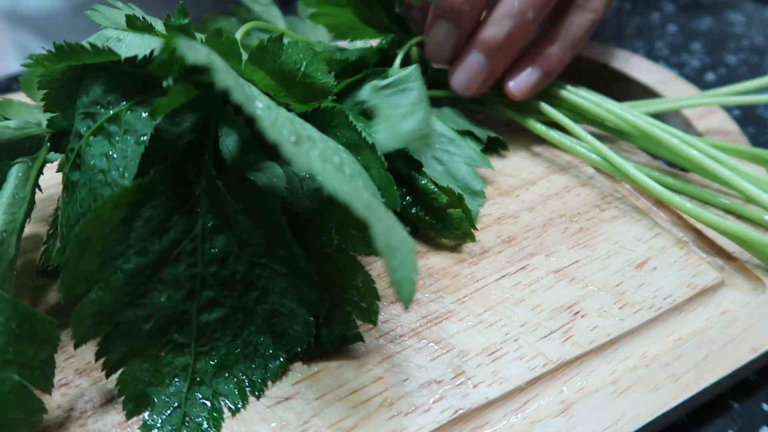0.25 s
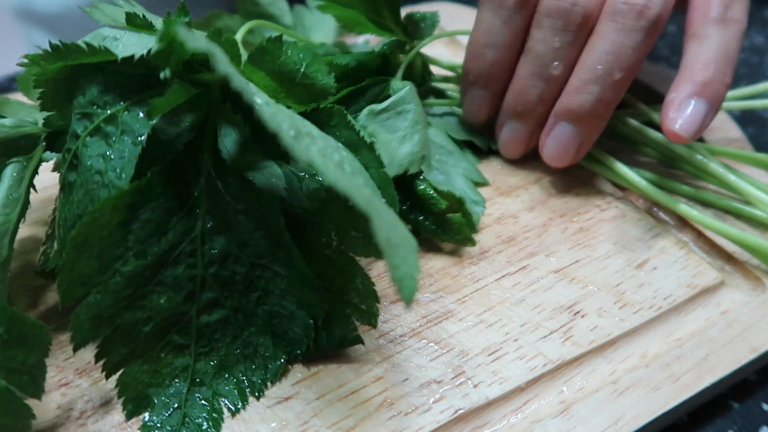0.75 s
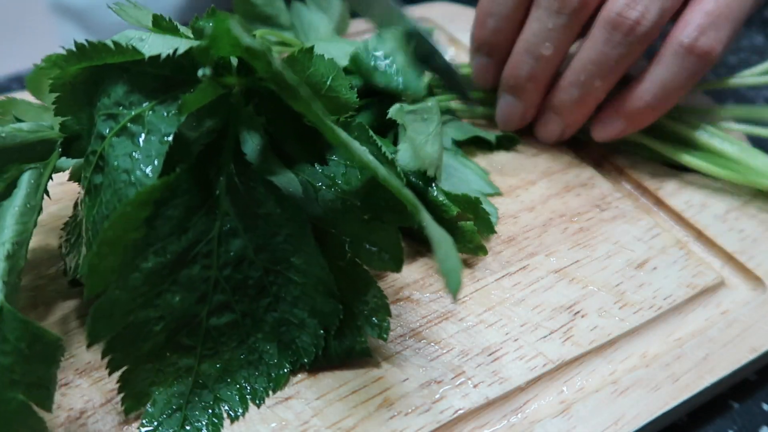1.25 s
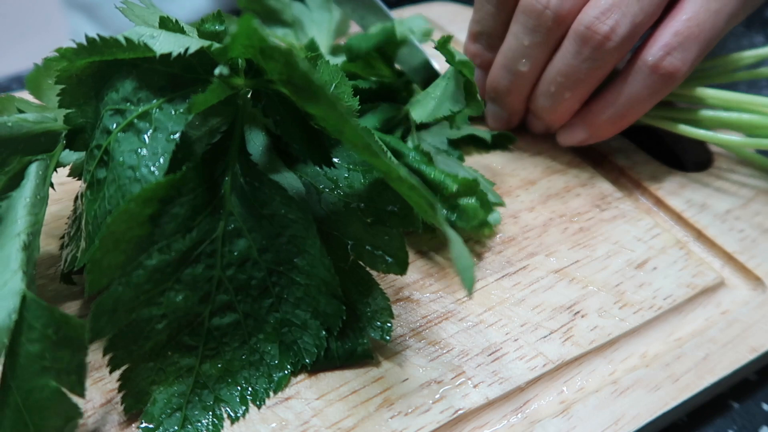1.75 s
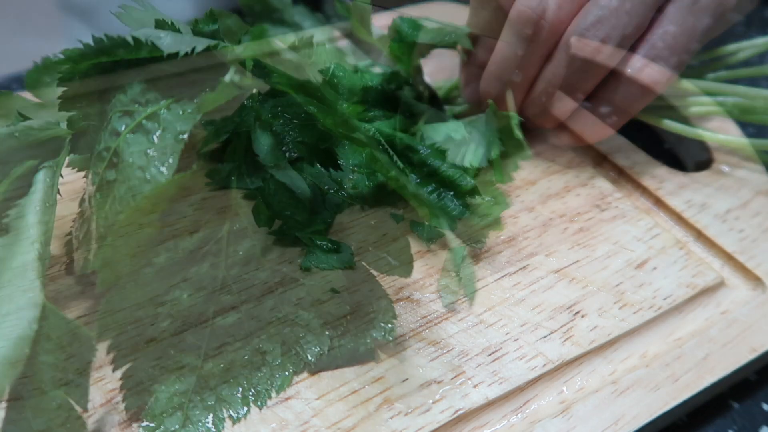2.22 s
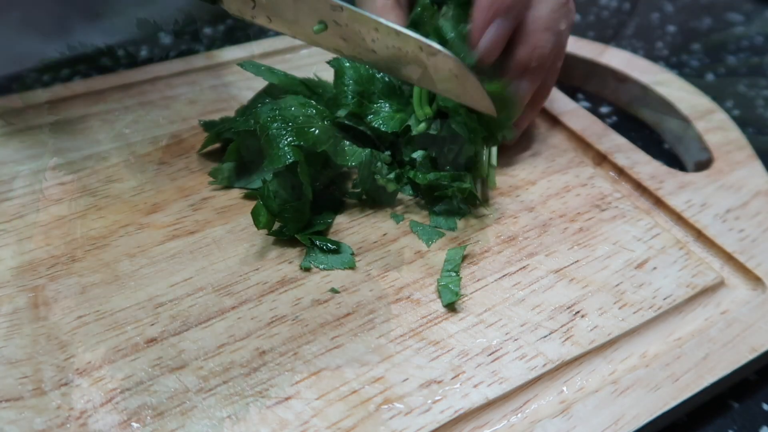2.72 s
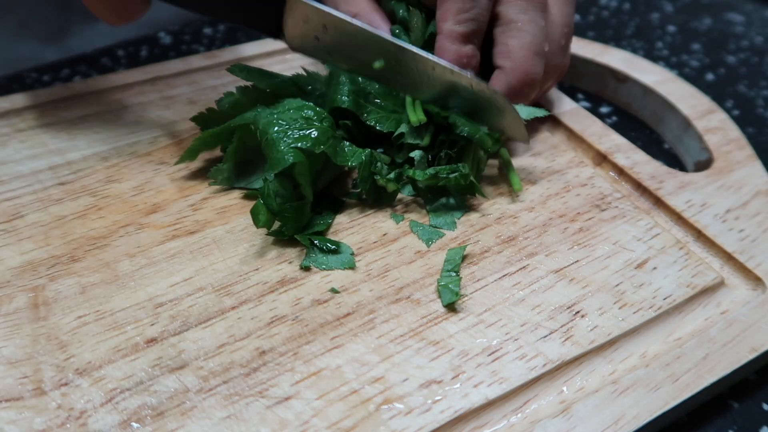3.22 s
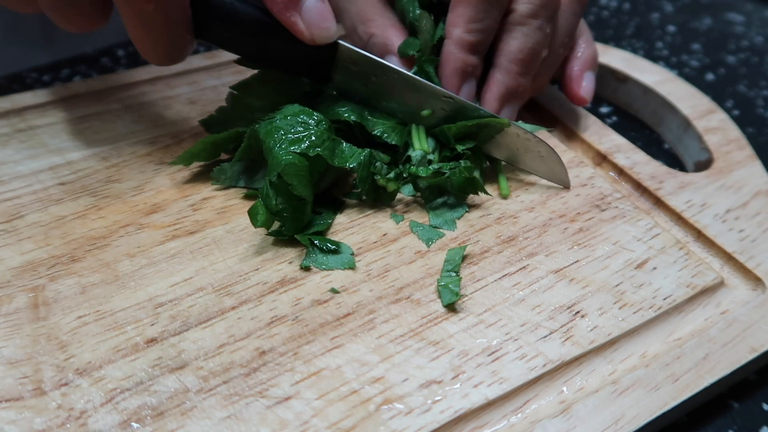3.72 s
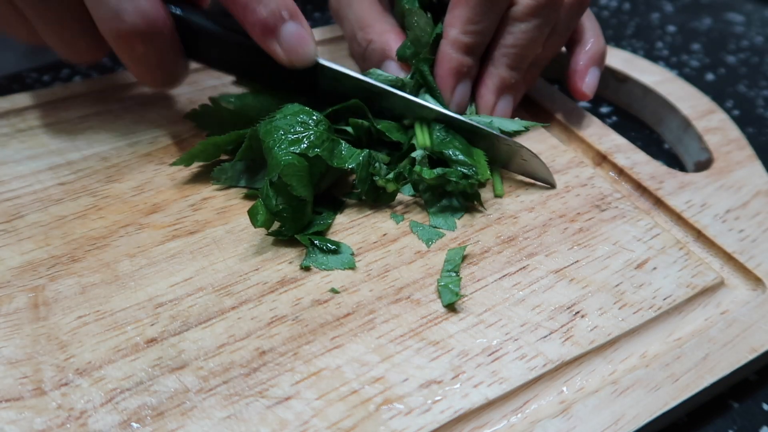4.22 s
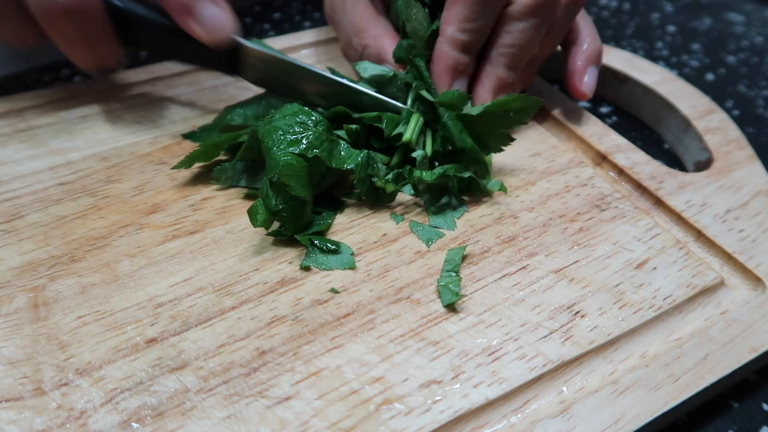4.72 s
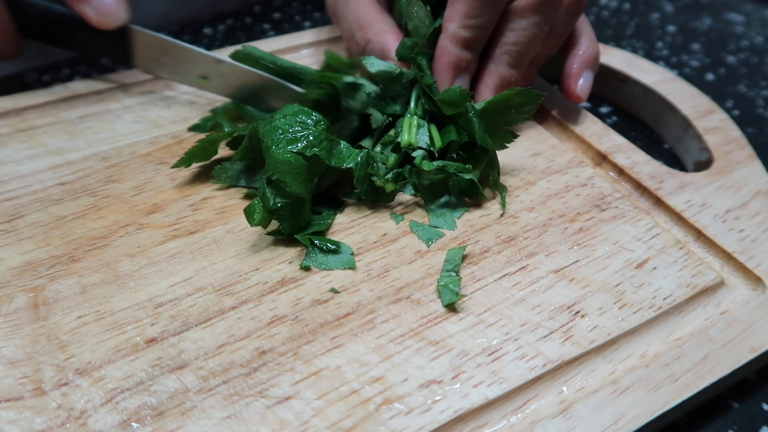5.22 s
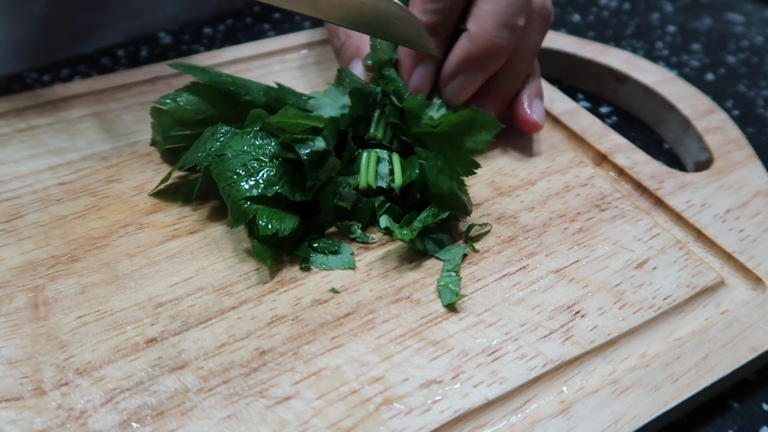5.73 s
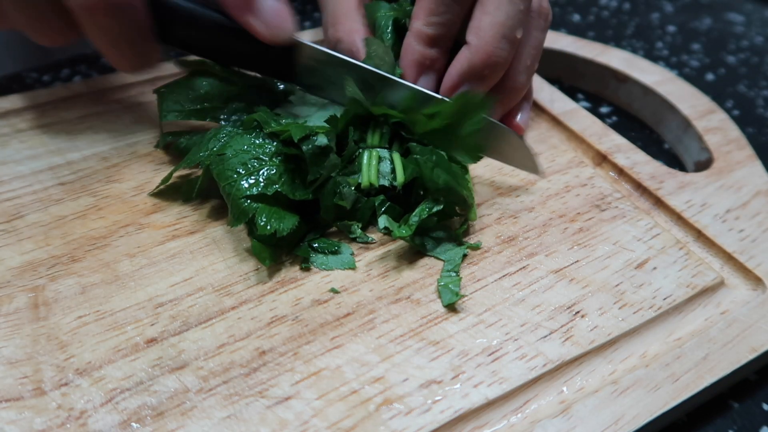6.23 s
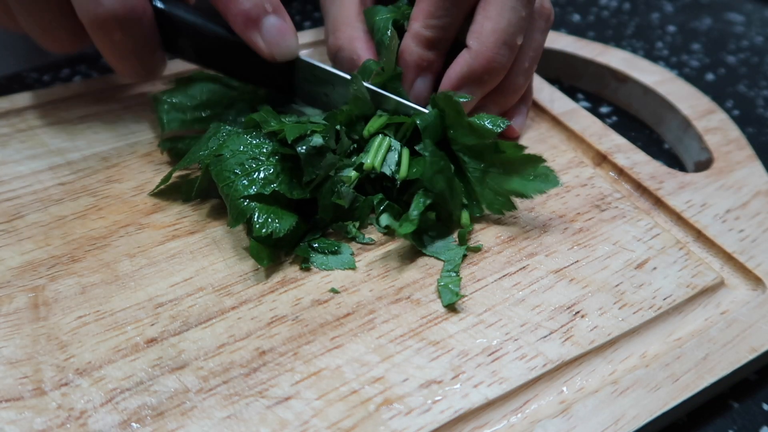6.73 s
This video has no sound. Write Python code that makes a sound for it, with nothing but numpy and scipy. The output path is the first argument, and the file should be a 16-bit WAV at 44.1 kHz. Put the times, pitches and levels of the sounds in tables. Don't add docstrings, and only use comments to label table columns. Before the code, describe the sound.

A small knife crunches through fresh leafy stems on a wooden board in two bursts, after soft leaf rustling, over a faint low kitchen hum.

```python
import sys
import numpy as np
from scipy import signal
from scipy.fft import rfft, irfft, next_fast_len
from scipy.io import wavfile
from scipy.ndimage import uniform_filter1d, map_coordinates

SR = 44100
rng = np.random.default_rng(int(sys.argv[2]) if len(sys.argv) > 2 else 0)


def boost(x):
    u = np.asarray(x, float) / 20
    return 10 ** u


def inscribe(sig):
    pcm = np.round(np.clip(np.atleast_2d(sig).T, -1, 1) * 32767)
    wavfile.write(sys.argv[1], SR, pcm.astype(np.int16))


N = 306936

# time_s, level_db
RUMBLE_LEVEL = [(0.0, -49), (0.15, -49.5), (0.52, -54.5), (0.89, -56.5), (1.27, -52), (1.55, -56.5),
                (1.76, -59.5), (2.09, -52.5), (2.46, -62), (3.0, -53), (3.89, -49.5), (4.59, -47),
                (4.92, -44), (5.23, -47), (6.07, -50), (6.49, -46), (6.75, -45), (6.96, -45.5)]
# frequency_hz, density_db
RUMBLE_SPECTRUM = [(18, -51), (30, -22.5), (48, -4.5), (70, -18), (86, -6), (113, 1), (129, -0.5),
                   (150, -4.5), (195, -2), (247, -5), (271, -15), (377, -15.5), (500, -23), (650, -54.5),
                   (1100, -120)]
# frequency_hz, density_db
AIR_SPECTRUM = [(180, -26), (300, -1.5), (493, -6.5), (563, -2.5), (747, -10), (882, -8.5), (1330, -12),
                (1600, -19.5), (2160, -22.5), (2820, -25), (4330, -35), (4790, -34), (12300, -49),
                (15800, -70.5)]
AIR_DB = -6
# multiple, level_db (against the rumble)
FRIDGE_ORDERS = [(1, -16.5), (2, -9.5), (3, -13), (4, -10)]
FRIDGE_HZ = 61.196
# frequency_hz, side_minus_mid_db
KITCHEN_SIDE = [(60, -27.5), (110, -31.5), (200, -15.5), (380, -3.5), (700, -6.5), (1290, -5), (2380, -0.5),
                (4400, 1.5), (8120, 1), (15000, 1.5)]
# frequency_hz, side_minus_mid_db
CUTTING_SIDE = [(60, -23), (110, -12), (200, -32.5), (380, -23), (700, -25.5), (1290, -44), (2380, -14.5),
                (4400, -6.5), (8120, 1.5), (15000, -1.5)]
# frequency_hz, t60_s
ROOM_DECAY = [(300, 0.183), (2000, 0.068), (10000, 0.076)]
# level_db, pitch_hz, rise_s, t60_s
STRAY_TONES = [
    (-42.5, 1080, .02, .2),
    (-54, 3500, .0005, .012),
    (-51, 3500, .0005, .012),
    (-43, 560, .003, .12),
    (-48, 1200, .001, .03),
    (-37, 45, .01, .12),
    (-38, 200, .005, .1),
    (-32, 2550, .0008, .018),
]
STRAY_STARTS = [.05, 1.208, 1.315, 3.091, 3.089, 4.705, 4.705, 2.8898]

# frequency_hz, density_db
CRUNCH_SPECTRUM = [(500, -39.5), (850, -4), (1040, -2), (1440, 3), (2090, 0), (2430, 3.5), (2700, 2),
                   (3250, 0.5), (7000, -18), (9100, -63.5), (15400, -120)]
# frequency_hz, density_db
CRISP_SPECTRUM = [(2650, -14.5), (4500, -2), (5300, -1), (10100, -6.5), (12500, -4), (14100, -10),
                  (15800, -9.5)]
# frequency_hz, density_db
PLANK_SPECTRUM = [(150, -43), (330, -11.5), (500, -3.5), (585, -6), (680, -4), (1000, -13.5), (1600, -42)]
# frequency_hz, width_hz, level_db
CRUNCH_MODES = [(1265, 258, -5.5), (2450, 145, -4.5)]
# frequency_hz, width_hz, level_db
BLADE_MODES = [(5400, 320, -4.5)]
# frequency_hz, width_hz, level_db
PLANK_MODES = [(585, 38.5, 2.5)]

# start_s, hold_s, crunch_db, crisp_db, board_pressure_db
CHOPS = [(4.047, 0.0083, -40.5, -13.5, 6), (4.249, 0.0478, -42, -11.5, 1), (4.49, 0.0198, -39.5, -12, 0.5),
         (4.706, 0.0162, -39.5, -11, 4), (4.812, 0.038, -47, -26, -7), (4.914, 0.0251, -36, -15, 0.5),
         (5.041, 0.0143, -40.5, -17.5, -17), (6.553, 0.0092, -38.5, -8.5, 3.5),
         (6.777, 0.0165, -39.5, -12, -9.5), (6.802, 0.0077, -38.5, -10.5, 5.5)]
CHOP_RISE_S, CHOP_FALL_S = 0.019, 0.0573
# start_s, hold_s, crunch_db, crisp_db, board_pressure_db
LIFTS = [(3.953, .002, -52, -10.5, 0), (4.171, 0.00175, -46, -15, 2.5), (4.395, 0.004, -49.5, -14.5, 6),
         (4.589, 0.057, -52.5, -12, -13.5), (4.874, 0.0044, -40.5, -16.5, -11.5),
         (5.085, .01, -49.5, -13, -3.5), (6.334, 0.0152, -48, -7.5, -8.5), (6.456, 0.0023, -49, -11, -6.5),
         (6.6, 0.015, -50.5, -26, 5.5), (6.687, 0.011, -47.5, -11, 6.5), (6.895, 0.047, -48, -12, 4.5)]
LIFT_RISE_S, LIFT_FALL_S = 0.101, 0.0622
# start_s, crunch_db, crisp_db, rise_s, fall_s (for 20 dB)
HANDLING = [(0.001, -59.5, -15, 0.11, 0.1223), (.3, -75, -19, 0.47, 0.48), (1.155, -69.5, -11, 0.25, 0.07),
            (1.35, -76.5, -22.5, 0.92, 0.17), (1.89, -59.5, -14, 0.0385, 0.1563),
            (2.079, -55.5, -9.5, 0.184, 0.1863), (2.193, -57.5, -11.5, 0.052, 0.1637),
            (2.345, -65, -12, 0.244, 0.25), (2.55, -77, -24, 0.32, 1.03), (2.91, -72.5, -19.5, 0.148, 0.45),
            (2.989, -62.5, -19, 0.2, 0.06), (3.27, -69, -8.5, 0.123, 0.14),
            (3.605, -63.5, -11.5, .025, 0.43), (3.69, -58.5, -9.5, 0.214, 0.05),
            (3.82, -64, -17.5, 0.47, 1.8), (5.275, -54.5, -17, 0.091, 0.2269),
            (5.656, -53.5, -19, 0.246, 0.03), (5.74, -71.5, -14.5, 0.33, 1.5),
            (5.95, -59, -15, 0.056, 0.24), (6.27, -59, -11.5, 0.355, 0.2), (5.4, -59, -14, 0.105, 0.06),
            (1.533, -66, -23, 0.0123, 0.01)]
FINGER_PRESS_DB = 0.5

# start_s, peak_db, pitch_hz, knock_db
BLOWS = [(3.9211, -42, 2380, -5.5), (3.9485, -43, 2450, -13), (4.0458, -29, 3020, -14.5),
         (4.0902, -32.5, 1400, -12), (4.2406, -38, 2430, -12), (4.2472, -26.5, 1820, -12.5),
         (4.2545, -28, 1740, -14), (4.2633, -27, 2390, -16.5), (4.278, -30, 2600, -9),
         (4.4728, -36.5, 1360, -12.5), (4.5055, -22.5, 2550, -13), (4.6918, -43, 2610, -6),
         (4.7021, -35.5, 2630, -8), (4.7209, -23, 2450, -11), (4.7995, -37, 1460, -5),
         (4.9305, -24, 2470, -13.5), (5.0136, -35, 2240, -8.5), (5.0226, -32, 2540, -15),
         (6.3261, -34, 1920, -15), (6.3473, -33, 2550, -11.5), (6.5489, -29.5, 1980, -8),
         (6.5555, -23, 1505, -12), (6.6832, -34, 1410, -2.5), (6.7986, -22, 2340, -15.5),
         (6.8799, -41, 1660, -1)]
BLOW_CRACK_DB = -12
# start_s, peak_db, pitch_hz, crack_db
SNAPS = [(3.5884, -39.5, 2380, -13.5), (3.6645, -42, 2240, -13.5), (3.7453, -37.5, 2920, -27.5),
         (3.798, -40, 2600, -9), (3.855, -44.5, 1550, -17.5), (4.016, -30, 2490, -12),
         (4.1583, -40, 1350, -13), (4.1745, -33, 2680, -9), (4.4817, -18.5, 1605, -34),
         (4.8198, -24.5, 1355, -27.5), (4.865, -24, 3500, -16.5), (4.8818, -24.5, 1430, -18.5),
         (4.9086, -13.5, 1353, -22.5), (4.951, -20, 2395, -6), (5.0394, -22.5, 2340, -15),
         (5.0477, -21.5, 2370, -12.5), (5.3194, -39, 1215, -15), (5.3581, -33.5, 2450, -6),
         (5.47, -33, 2903, -17.5), (5.9447, -41, 1410, -24), (6.263, -36, 3810, -22.5),
         (6.3582, -32.5, 2400, -9), (6.5398, -33, 2200, -5), (6.5948, -22, 2227, -21.5),
         (6.76, -31, 3210, -3), (6.7734, -14.5, 2926, -16.5), (6.8643, -32.5, 2950, -5.5),
         (6.9151, -27.5, 2430, -9.5), (6.921, -26.5, 2510, -7.5), (6.936, -29.5, 1610, -16.5)]
SNAP_KNOCK_DB = -21.5
# start_s, peak_db, pitch_hz, crack_db
TICKS = [(1.151, -45, 1730, -24.5), (1.3146, -43, 1996, -29.5), (1.5297, -54.5, 2280, -22),
         (1.708, -57, 2350, -20.5), (1.8407, -47.5, 2380, -28.5), (1.8857, -36.5, 1630, -14.5),
         (1.8953, -43, 2560, -11), (1.9996, -42, 1600, -5.5), (2.007, -41, 1870, -4.5),
         (2.03, -37, 2650, -20), (2.0408, -32.5, 1550, -7.5), (2.0627, -37, 1980, -14),
         (2.0751, -39, 1590, -11), (2.087, -35.5, 2616, -13), (2.1036, -36, 2550, -7.5),
         (2.1376, -33.5, 1840, -19.5), (2.1473, -37.5, 1940, -17), (2.1836, -40.5, 1890, -7.5),
         (2.2383, -43.5, 1550, -15), (2.2559, -43, 1640, -18.5), (2.2895, -39.5, 1394, -18),
         (2.327, -39, 2635, -4.5), (2.3774, -48.5, 2280, -19.5), (2.4676, -43.5, 1790, -15.5),
         (2.5282, -52, 2910, -20), (2.543, -51.5, 2860, -25), (2.8897, -45, 4300, -10),
         (2.9842, -36.5, 2445, -16.5), (3.4749, -51.5, 2550, -21), (3.5029, -48.5, 2530, -20.5)]
TICK_KNOCK_DB = -17
# start_s, peak_db, pitch_hz
SHREDS = [(3.5996, -42.5, 2450), (3.7193, -48.5, 1510), (3.8286, -49.5, 2630), (3.886, -50.5, 5500),
          (4.5867, -49.5, 2320), (5.385, -42.5, 2500), (5.402, -44, 5460), (5.792, -47, 2890),
          (6.081, -49.5, 5900), (6.1027, -56, 5500), (6.388, -39, 3510), (6.424, -40.5, 1300),
          (6.497, -39, 1460)]
SHRED_CRACK_DB = -15.5
# start_s, peak_db, pitch_hz
THREADS = [(1.5372, -60.5, 2760), (1.8505, -53, 1980), (1.8768, -49, 1360), (1.8817, -47.5, 1590),
           (1.943, -56.5, 1980), (2.041, -38.0, 2320), (2.0571, -47.5, 2450), (2.0699, -43.0, 2430),
           (2.1311, -44, 1550), (2.1902, -44.5, 2820), (2.2007, -44.5, 1830), (2.3211, -47, 2880),
           (2.3905, -55.0, 1340), (2.4054, -54, 1570), (2.5046, -63.5, 2450), (2.5367, -53.5, 1460),
           (2.5928, -64.0, 2430), (2.635, -64, 3000), (2.6658, -63.0, 3010), (2.953, -56, 3000),
           (2.9892, -47.5, 2410), (3.5488, -56.0, 2410), (3.6162, -51, 2450), (3.6352, -53.5, 2410),
           (3.6417, -48.5, 1200), (3.9076, -49.5, 2560), (3.9137, -47, 1790), (4.0486, -28, 1410),
           (4.0899, -40.5, 2480), (4.1713, -34, 1345), (4.2876, -35, 2320), (4.3823, -40.5, 1530),
           (4.4819, -25.0, 2480), (4.5402, -40.0, 2540), (4.5795, -45.5, 2370), (4.6396, -38.0, 1310),
           (4.6997, -35.0, 2670), (4.7142, -29, 1400), (4.9064, -27, 2700), (4.9173, -28, 1250),
           (4.9255, -27, 900), (4.9373, -24.5, 1340), (4.942, -27, 1010), (4.9835, -40, 1530),
           (5.0426, -31.5, 2390), (5.256, -44, 1440), (5.261, -47.5, 2500), (5.2865, -41.5, 1160),
           (5.3238, -44.0, 1180), (5.9301, -48.5, 1250), (5.9359, -48.5, 1590), (6.0466, -54.5, 2130),
           (6.4342, -39, 1290), (6.4505, -40.5, 2350), (6.4597, -37, 2240), (6.5583, -31.5, 2390),
           (6.5692, -30, 2000), (6.8023, -24, 1800), (6.8528, -41.0, 2500), (6.9497, -38.5, 2130)]
THREAD_DB, THREAD_CRACK_DB, THREAD_KNOCK_DB = 1, -17.5, -24
CUT_CYCLES, TICK_CYCLES = 1.0, 0.85
SNAP_PEAK_S = 0.0005
# frequency_hz, density_db
CRACK_SPECTRUM = [(1500, -30), (2650, -12), (4200, -1), (5500, 1), (7000, -6), (10100, -13), (12500, -9),
                  (15800, -16)]
# frequency_hz, level_db, t60_s
KNOCK_MODES = [(341.5, -1.5, 0.073), (581.9, 5, 0.0804), (790.8, 0.5, 0.065), (998, -6.5, 0.059)]
# delay_s, level_db
BOUNCES = [(.0022, -14.5), (.0068, -15.5)]

# start_s, peak_db, first_pitch_hz, t60_s
THUMPS = [(4.0455, -23.5, 2604, 0.0684), (4.0605, -32.5, 900, 0.063), (4.249, -38, 896, 0.16),
          (4.262, -35.5, 793, 0.097), (4.2835, -36.5, 698, 0.212), (4.484, -35, 1200, .05),
          (4.499, -33.5, 902, .1), (4.508, -36, 896, 0.063), (4.702, -34.5, 1003, 0.048),
          (4.722, -33.5, 1196, 0.088), (4.917, -30, 1096, 0.071), (4.933, -31, 1106, 0.089),
          (6.5535, -22, 1702, 0.0706), (6.779, -34, 1200, 0.076), (6.8005, -26.5, 2228, 0.064)]
THUMP_HZ, THUMP_SAG_S, THUMP_RISE_S = 584.5, 0.001598, 0.00129
# frequency_hz, level_db, t60_s
THUMP_PARTNERS = [(190, -12, .08), (345, -8, .05), (850, -9, .04)]


def unit(x):
    return x / np.sqrt(np.mean(x ** 2) + 1e-20)


def along(points, hz):
    f, v = np.transpose(points)
    return np.interp(np.log(hz + 1), np.log(f + 1), v)


def curves(rows):
    s, *cols = np.transpose(rows)
    return [np.interp(np.arange(N) / SR, s, c) for c in cols]


def wobble(rate):
    knots = rng.standard_normal(int(N * rate / SR) + 4)
    return map_coordinates(knots, [np.arange(N) * rate / SR])


def filtered(x, response):
    size = next_fast_len(N + SR // 2)
    spectrum = rfft(x, size) * response(np.fft.rfftfreq(size, 1 / SR))
    return irfft(spectrum, size)[..., :N]


def coloured(x, spectrum, modes=()):
    def colour(f):
        ring = 1 + sum(boost(db) * 1j * f * width / (centre * centre - f * f + 1j * f * width)
                       for centre, width, db in modes)
        gain = boost(along(spectrum, f)) * ring
        return gain / np.sqrt(np.mean(np.abs(gain) ** 2))
    return filtered(x, colour)


def noise(envelope, spectrum, modes=(), patchy_db=0):
    z = signal.stft(rng.standard_normal((2, N)), nperseg=256)[2]
    patches = uniform_filter1d(rng.standard_normal(z.shape[1:]), size=4, axis=0)
    patches = uniform_filter1d(patches, size=8, axis=1)
    pair = signal.istft(z * boost(patchy_db * unit(patches)), nperseg=256)[1][:, :N]
    return coloured(envelope * unit(pair), spectrum, modes)


def ports(pair, side):
    across = filtered(pair[1], lambda hz: boost(along(side, hz)))
    return np.array([pair[0] + across, pair[0] - across])


def kitchen():
    rumble_db, = curves(RUMBLE_LEVEL)
    turns = FRIDGE_HZ * np.arange(N) / SR
    hum = np.zeros(N)
    for k, db in FRIDGE_ORDERS:
        level = boost(db + 1.7 * wobble(4.996))
        hum += level * np.sin(2 * np.pi * k * turns + 0.515 * wobble(4))
    rumble = boost(1.0) * noise(boost(wobble(7.6)), RUMBLE_SPECTRUM)
    low = boost(rumble_db) * (rumble + [[1], [0]] * hum)
    air_db = rumble_db + AIR_DB + 0.28 * wobble(4.684)
    air = noise(boost(air_db), AIR_SPECTRUM, patchy_db=1.5)
    return ports(low + air, KITCHEN_SIDE)


def room(x):
    hz, t, z = signal.stft(rng.standard_normal((2, SR // 3)), SR, nperseg=256)
    decay = boost(-60 * t / along(ROOM_DECAY, hz)[:, None])
    tail = signal.istft(z * decay, SR, nperseg=256)[1]
    delayed = np.pad(x, (200, 0))[None]
    return signal.fftconvolve(delayed, tail / np.linalg.norm(tail[0]), axes=1)[:, :N]


def strays():
    t = np.maximum(np.arange(N) / SR - np.array(STRAY_STARTS)[:, None], 0)
    db, hz, rise, t60 = np.transpose(STRAY_TONES)[:, :, None]
    tones = boost(db - 60 * t / t60) * (1 - np.exp(-t / rise)) * np.sin(2 * np.pi * hz * t)
    return tones.sum(axis=0)


def thumps():
    out, t = np.zeros(N + SR), np.arange(SR // 5) / SR
    for s, db, first_hz, t60 in THUMPS:
        sag = (first_hz - THUMP_HZ) * THUMP_SAG_S * (1 - np.exp(-t / THUMP_SAG_S))
        tone = boost(-60 * t / t60) * np.sin(2 * np.pi * (THUMP_HZ * t + sag))
        luck = rng.standard_normal((len(THUMP_PARTNERS), 2))
        for (hz, level, fade), (a, b) in zip(THUMP_PARTNERS, luck):
            partner = np.sin(2 * np.pi * hz * (1 + 0.04 * b) * t)
            tone = tone + boost(level + 2.5 * a - 60 * t / fade) * partner
        out[round(s * SR):][:len(t)] += boost(db) * (1 - np.exp(-t / THUMP_RISE_S)) * tone
    return out[:N]


def hands():
    gestures = ([row + (CHOP_RISE_S, CHOP_FALL_S) for row in map(tuple, CHOPS)]
                + [row + (LIFT_RISE_S, LIFT_FALL_S) for row in map(tuple, LIFTS)]
                + [(s, 0, db, crisp_db, FINGER_PRESS_DB, rise, fall)
                   for s, db, crisp_db, rise, fall in HANDLING])
    s, hold, db, crisp_db, press_db, rise, fall = np.transpose(gestures)[:, :, None]
    t = np.arange(0, N + 32, 32) / SR
    swell_db = -20 * np.maximum(s - t, 0) / rise
    fade_db = -20 * np.maximum(t - s - hold, 0) / fall
    power = boost(db + swell_db + fade_db) ** 2

    def total(extra_db):
        level = np.sqrt((power * boost(extra_db) ** 2).sum(axis=0))
        return np.interp(np.arange(N) / SR, t, level)
    crunch, crisp, press = total(0), total(crisp_db), total(press_db)
    return crunch, crisp / crunch, press


def contacts():
    return ([(s, db, hz, knock_db, BLOW_CRACK_DB, CUT_CYCLES) for s, db, hz, knock_db in BLOWS]
            + [(s, db, hz, SNAP_KNOCK_DB, crack_db, CUT_CYCLES) for s, db, hz, crack_db in SNAPS]
            + [(s, db, hz, TICK_KNOCK_DB, crack_db, TICK_CYCLES) for s, db, hz, crack_db in TICKS]
            + [(s, db, hz, TICK_KNOCK_DB, SHRED_CRACK_DB, TICK_CYCLES) for s, db, hz in SHREDS]
            + [(s, db + THREAD_DB, hz, THREAD_KNOCK_DB, THREAD_CRACK_DB, CUT_CYCLES)
               for s, db, hz in THREADS])


def crackle(rate, spread_db, t60, bed):
    happens = rng.random(N) < rate / SR
    sizes = happens * boost(-spread_db * np.log(0.053 + rng.random(N)))
    decay = boost(-60 * np.arange(SR // 20) / SR / t60)
    ticks = signal.fftconvolve(sizes, decay)[:N]
    return unit(bed + unit(np.abs(ticks)))


def fibres(count, low_hz, high_hz, cycles, spread_db):
    luck, t = rng.random((count, 4, 1)), np.arange(256) / SR
    hz = low_hz * (high_hz / low_hz) ** luck[:, 1]
    size = boost(-spread_db * np.log(0.078 + luck[:, 2]))
    at = (luck[:, 0] * N).astype(int) + np.arange(256)
    showers = []
    for k in range(2):
        pops = size * np.exp(-t * hz / cycles) * np.sin(2 * np.pi * (hz * t + k * luck[:, 3]))
        showers.append(np.bincount(at.ravel(), pops.ravel(), N + 256)[:N])
    return unit(np.array(showers))


def leaves():
    crunch, crisp, press = hands()
    flares, t = np.zeros(N + SR), np.arange(SR // 16) / SR
    for s, db, *_ in contacts():
        flare = boost(db - 16 - 60 * t / 0.0478) * (1 - np.exp(-t / 0.00051))
        flares[round(s * SR):][:len(t)] += flare
    effort = np.hypot(boost(1.0) * crunch, flares[:N])

    tearing = boost(-3.0) * effort * crackle(rate=240, spread_db=3.0, t60=0.012, bed=1.6)
    body = noise(tearing, CRUNCH_SPECTRUM, CRUNCH_MODES, patchy_db=1.5)
    shower = fibres(count=2000, low_hz=861.4, high_hz=5850, cycles=2.15, spread_db=3.0)
    pops = coloured(boost(-14.0) * effort * shower, CRUNCH_SPECTRUM, CRUNCH_MODES)
    hissing = effort * crisp * crackle(rate=390, spread_db=8.5, t60=0.037, bed=0.77)
    fizz = noise(hissing, CRISP_SPECTRUM, BLADE_MODES, patchy_db=2.5)
    rubbing = boost(-8) * press * crackle(rate=180, spread_db=-2.5, t60=0.0267, bed=0.45)
    drone = noise(rubbing, PLANK_SPECTRUM, PLANK_MODES)
    return body + pops + fizz + drone


def board_knock(t):
    luck = rng.standard_normal((2, 2 * len(KNOCK_MODES), 1))
    knock = np.zeros((2, len(t)))
    for k, (hz, level, t60) in enumerate(KNOCK_MODES):
        fade = boost(level + 2.0 * luck[:, 2 * k] - 60 * t / t60)
        detuned_hz = hz * (1 + 0.0323 * luck[:, 2 * k + 1])
        knock += fade * np.sin(2 * np.pi * detuned_hz * t) * (1 - np.exp(-t * hz / 0.83))
    return knock


def bounced(hz):
    return 1 + sum(boost(db) * np.exp(-2j * np.pi * hz * delay) for delay, db in BOUNCES)


def cuts():
    snaps, cracks, knocks = np.zeros((3, 2, N + SR))
    t = np.arange(SR // 12) / SR
    for s, db, hz, knock_db, crack_db, cycles in contacts():
        knock = board_knock(t)
        rise = t * hz / cycles
        onset = np.minimum(rise, 1)
        tone = np.sin(2 * np.pi * hz * t)
        ping = (rise * np.exp(1 - rise)) ** 2 * tone
        ring = 0.12 * onset * boost(-60 * t / 0.024) * tone
        crack = boost(crack_db + 1.5 - 60 * t / 0.003) * onset * rng.standard_normal((2, len(t)))
        start = round((s + SNAP_PEAK_S - cycles / hz) * SR)
        at = slice(start, start + len(t))
        snaps[:, at] += boost(db - 1.1) * (ping + ring)
        cracks[:, at] += boost(db - 2.5) * crack
        knocks[:, at] += boost(db + knock_db - 4.0) * knock
    breaking = snaps[:, :N] + coloured(cracks[:, :N], CRACK_SPECTRUM)
    return filtered(breaking, bounced) + knocks[:, :N]


def scene():
    near = leaves() + cuts()
    direct = ports(near, CUTTING_SIDE) * boost([[-0.3], [0.3]])
    echo = boost(-19) * room(near[0])
    return direct + echo + kitchen() + strays() + thumps()


def top_cut(x):
    return signal.sosfilt(signal.butter(12, 15900, fs=SR, output="sos"), x)


def record(dry):
    top_hz, bass_hz = 15830, 38
    heard = filtered(dry, lambda f: (f < top_hz) * (1j * f / (bass_hz + 1j * f)) ** 3)
    return top_cut(heard)


dry = scene()
out = record(dry)
inscribe(out)
```